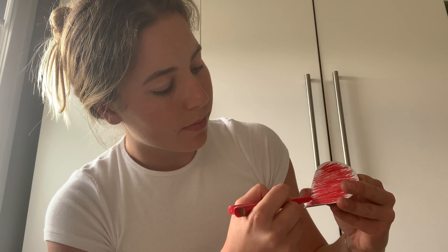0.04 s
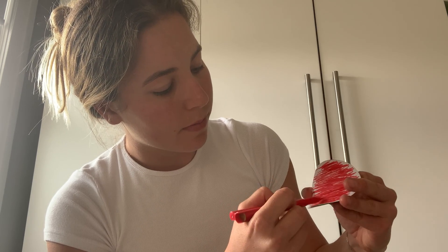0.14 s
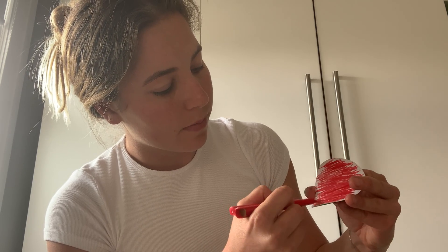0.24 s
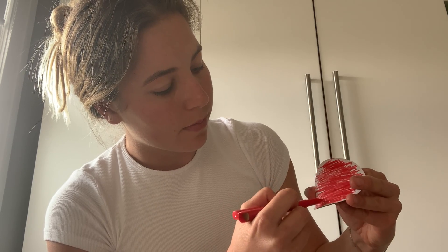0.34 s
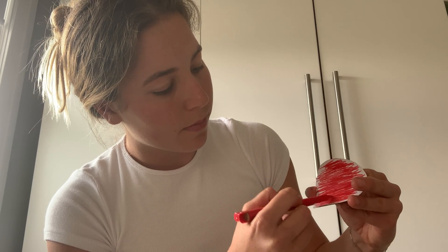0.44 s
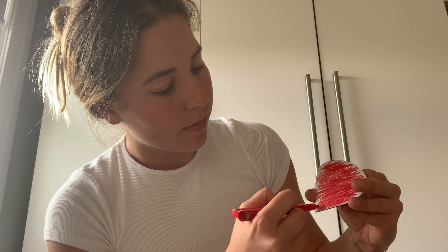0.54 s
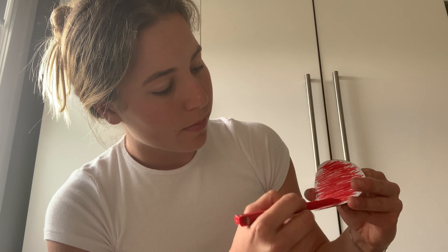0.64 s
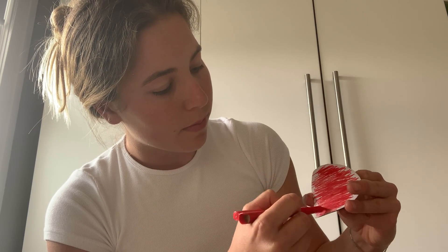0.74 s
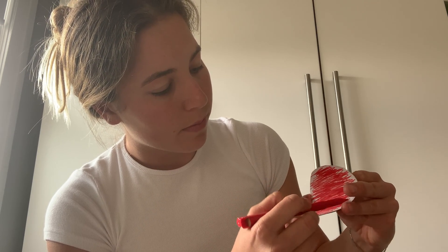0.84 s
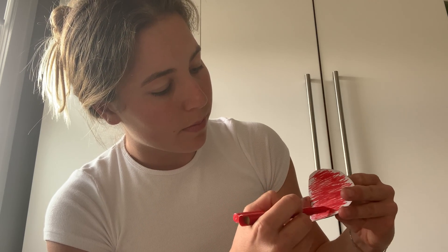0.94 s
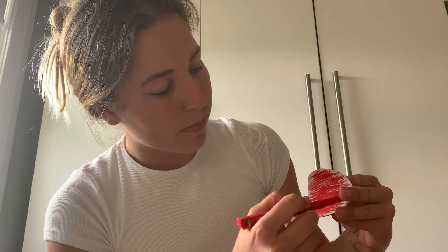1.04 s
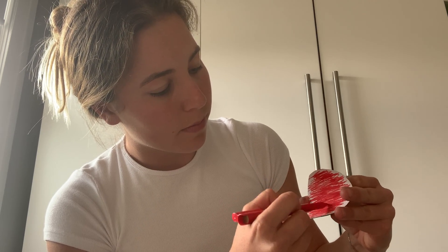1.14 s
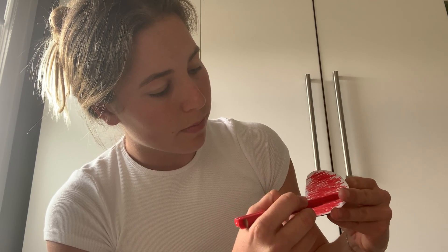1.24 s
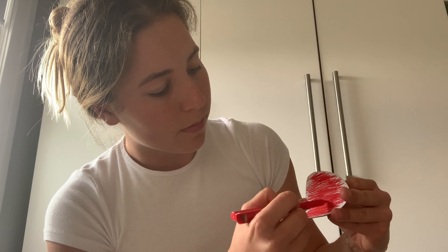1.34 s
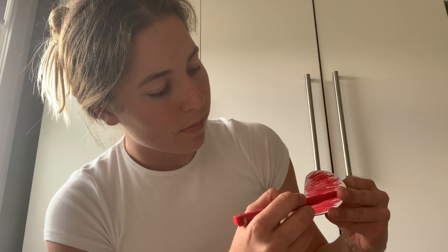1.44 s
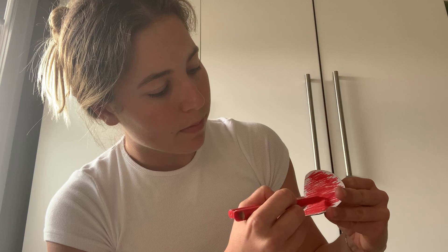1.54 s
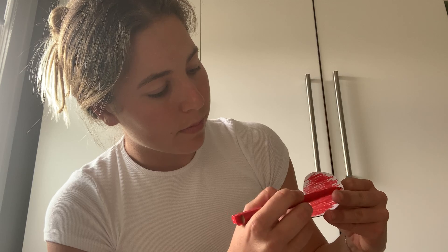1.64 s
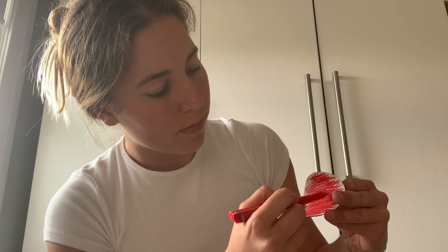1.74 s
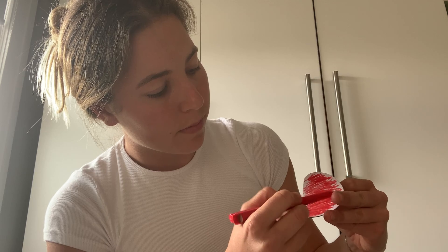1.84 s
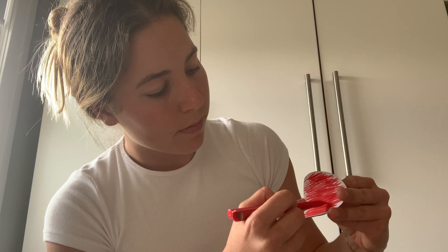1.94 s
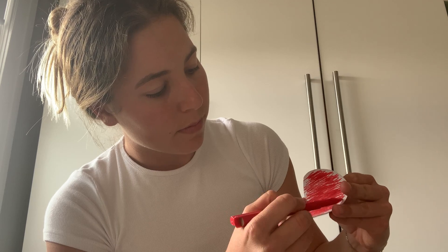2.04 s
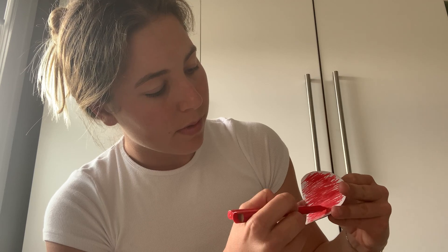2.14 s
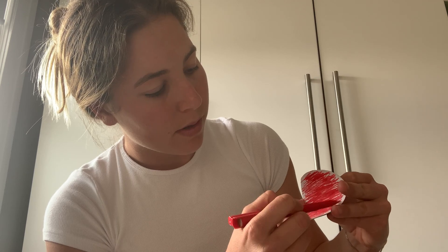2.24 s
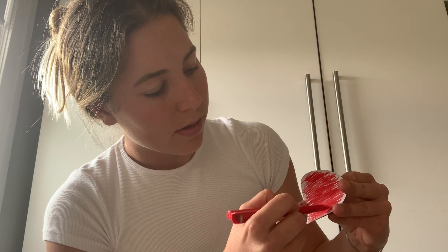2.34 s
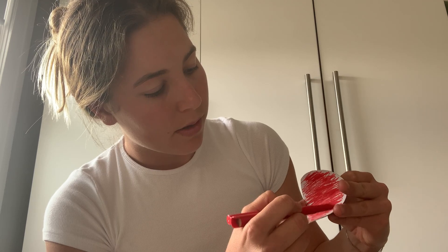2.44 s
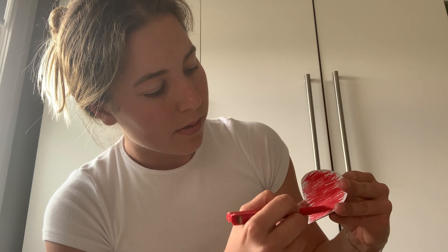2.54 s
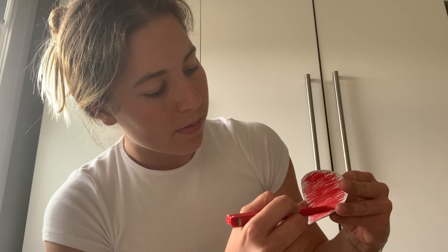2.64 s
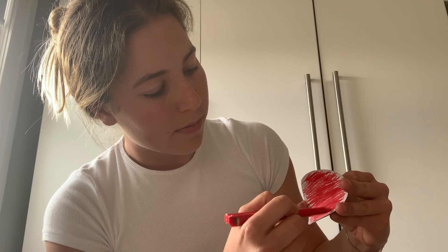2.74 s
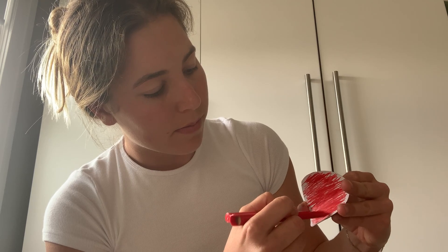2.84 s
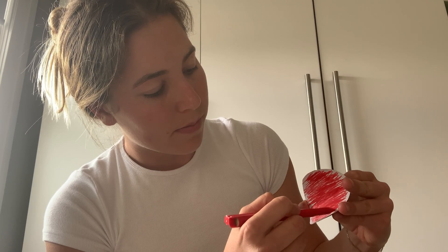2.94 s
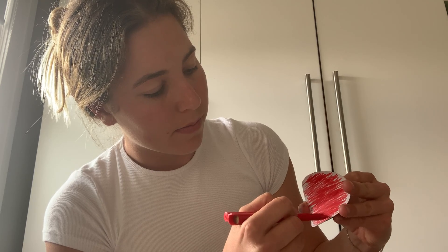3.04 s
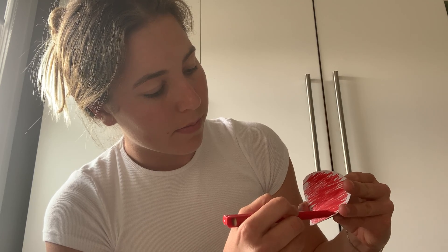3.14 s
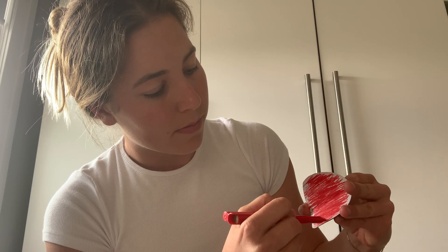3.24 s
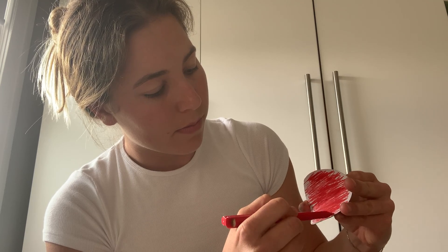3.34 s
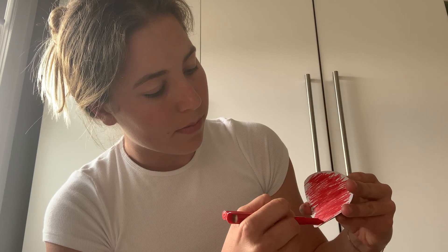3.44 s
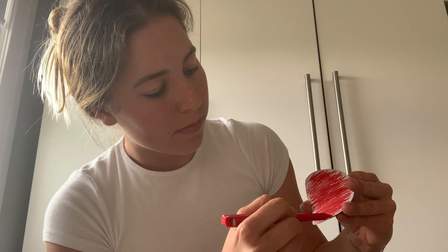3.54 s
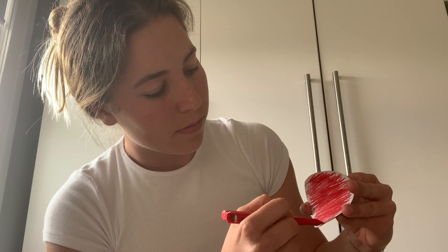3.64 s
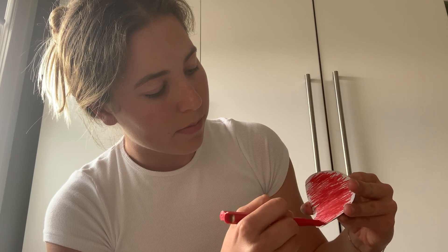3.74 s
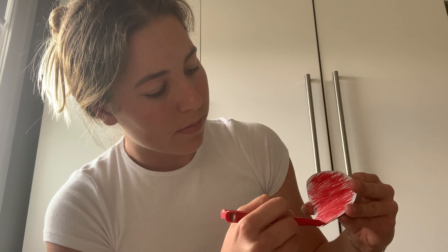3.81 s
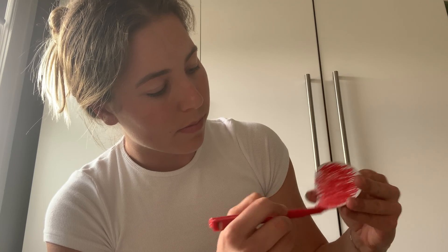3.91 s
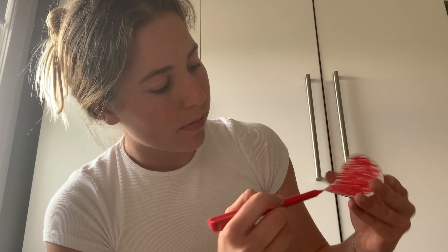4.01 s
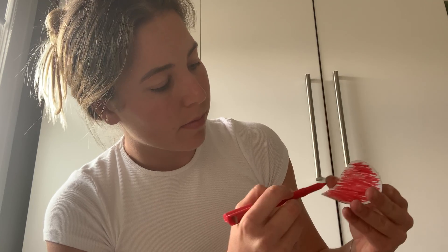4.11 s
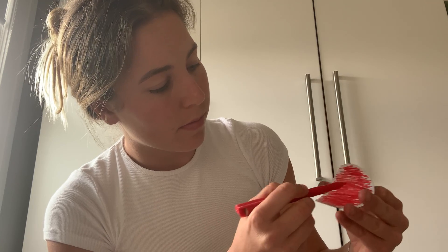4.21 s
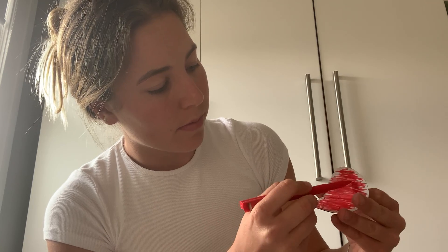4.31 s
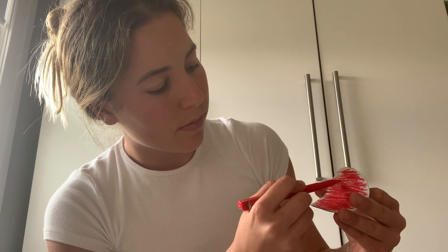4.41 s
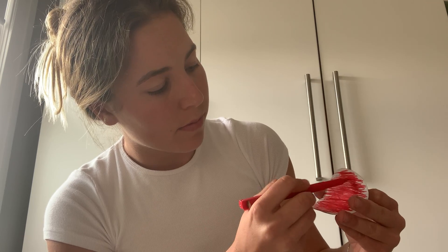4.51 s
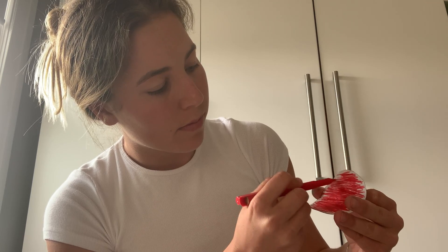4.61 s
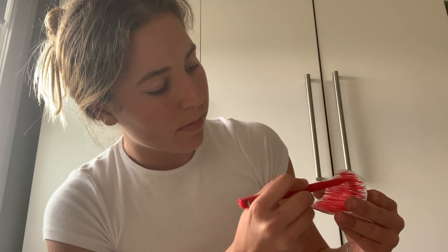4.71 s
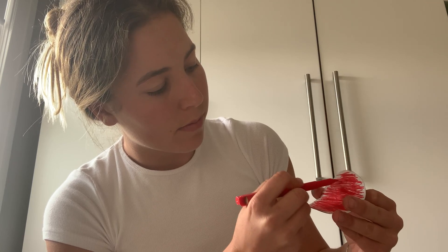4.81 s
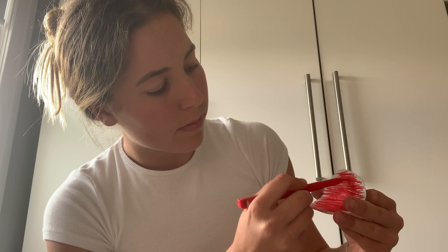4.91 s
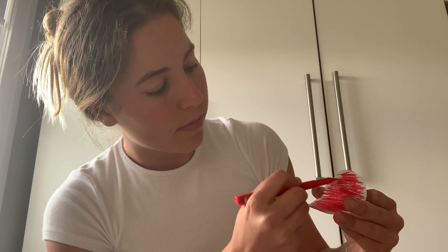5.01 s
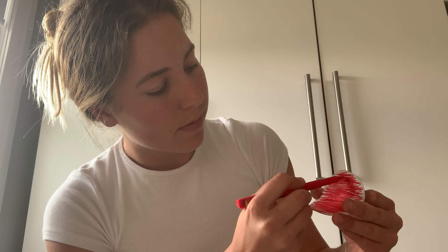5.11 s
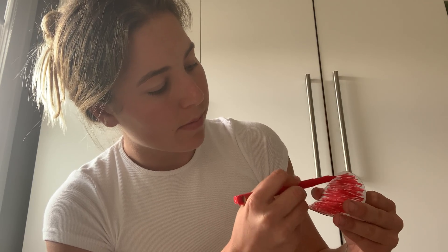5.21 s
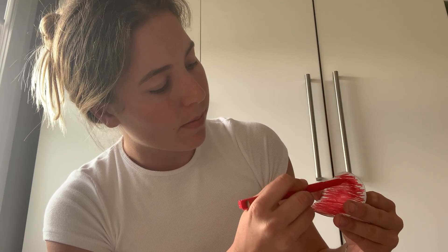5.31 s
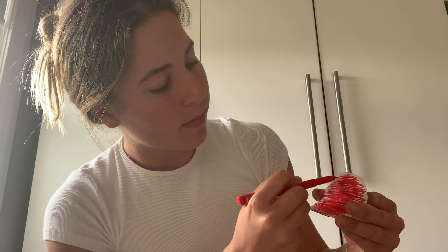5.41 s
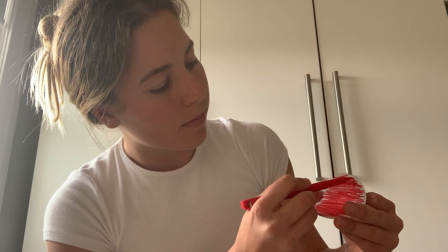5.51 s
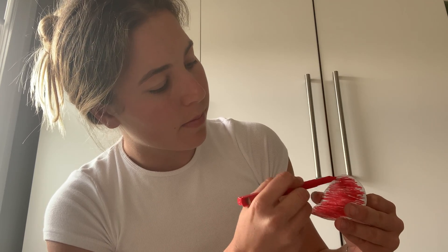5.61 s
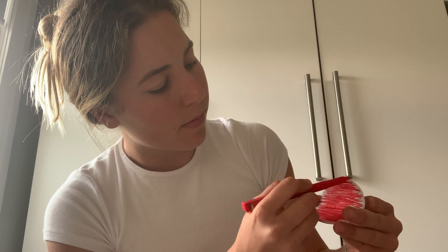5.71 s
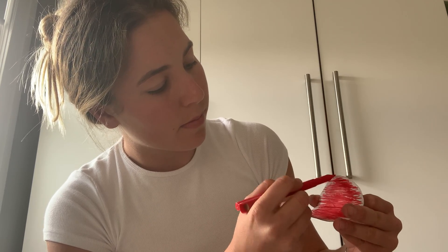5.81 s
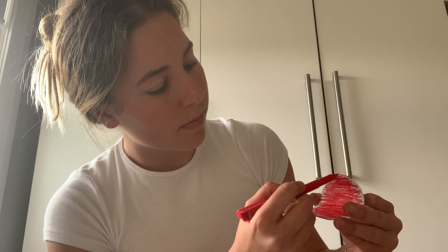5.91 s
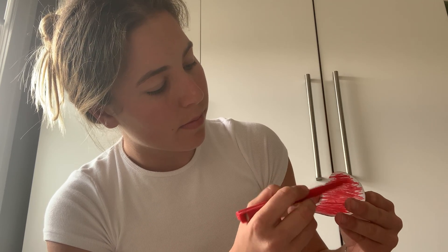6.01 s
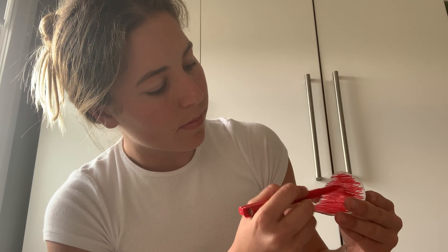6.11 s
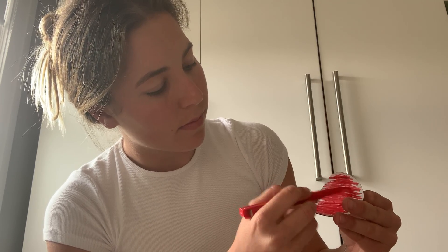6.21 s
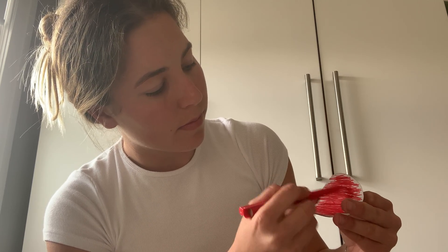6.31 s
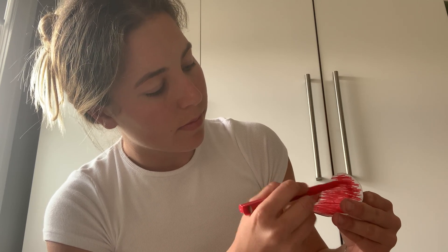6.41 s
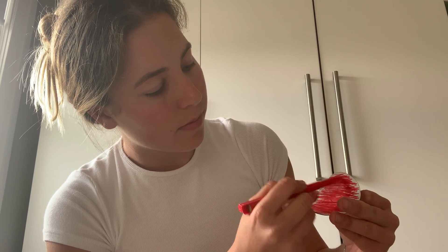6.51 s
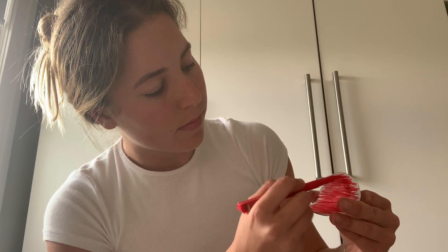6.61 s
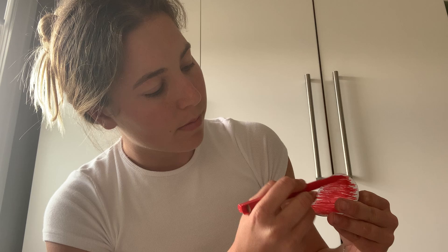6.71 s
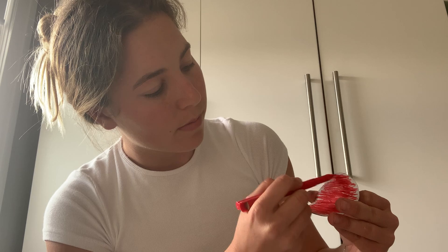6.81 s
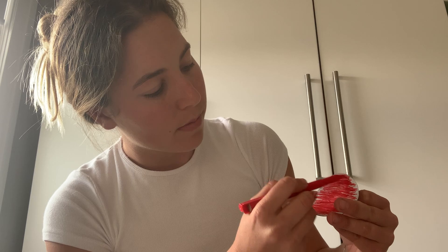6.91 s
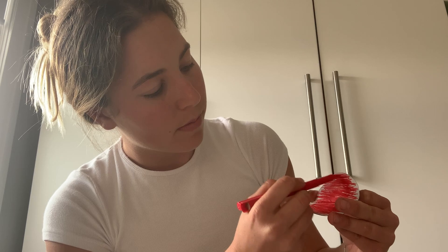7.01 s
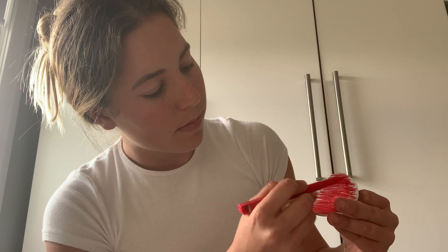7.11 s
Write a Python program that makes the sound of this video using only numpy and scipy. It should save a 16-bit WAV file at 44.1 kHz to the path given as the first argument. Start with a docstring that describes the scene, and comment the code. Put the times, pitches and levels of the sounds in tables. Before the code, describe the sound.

A felt-tip marker scribbles rapidly on a small card, hissing and rasping with two short pauses, over a faint fridge hum.

```python
"""A felt-tip marker scribbles back and forth, ten strokes a second, in three bouts on a hand-held card.
The felt hisses as its fibres catch and slip; the card rasps, flexes, and drums where the tip drags
near a loose edge. The tip lifts twice and taps down again.
Around it, a kitchen with a humming fridge, heard by two close microphones."""
import sys
import numpy as np
from scipy import signal
from scipy.fft import rfft, irfft, next_fast_len
from scipy.io import wavfile

SR = 44100
rng = np.random.default_rng(int(sys.argv[2]) if len(sys.argv) > 2 else 0)


def output_pcm(signal):
    """Save a mono or channel-first signal as 16-bit PCM at the path in sys.argv[1].

    Samples are clipped to [-1, 1] before scaling.
    """
    pcm = np.clip(np.atleast_2d(signal).T, -1, 1) * 32767
    wavfile.write(sys.argv[1], SR, np.round(pcm).astype(np.int16))


N = 315495
REGRIP_S = 4.2  # first grip gives way to second

# marker strokes: start/s, length/s, level/dB, pressure swell/dB, arch (0 flat, 2 peaked),
# turn re stroke/dB, scratch re hiss/dB, card rasp/dB, upper re lower card modes/dB
STROKES = [(-0.004, 0.082, -42, -6, 0.42, -18, 1, -65, 5),
           (0.092, 0.072, -45.0, 3, 0.35, -15, 3.5, -60, -4.5),
           (0.175, 0.086, -37.5, -8, 1.2, -29, -1, -63, 4.5),
           (0.275, 0.08, -47.5, -8, 0.4, -27, 3.5, -62, 4.5),
           (0.368, 0.081, -43, -6, 1.2, -28, 5, -68.5, 22),
           (0.466, 0.077, -46.0, 0.5, 0.15, -39, 3, -64.5, 12.5),
           (0.56, 0.084, -40.5, -8, 2, -31, 1, -58.5, 1),
           (0.651, 0.09, -42.5, 8, 0.21, -19, -0.5, -54.5, -4),
           (0.764, 0.071, -35, -6, 1.9, -23, -4.5, -55.5, -8),
           (0.849, 0.091, -37.0, 4, 0.65, -19, 0, -52.5, -7.0),
           (0.953, 0.083, -36.5, 2, 1.5, -27, -1.5, -54.5, 0),
           (1.054, 0.098, -41.5, -4, 1.6, -19, 1, -56.0, -1),
           (1.156, 0.069, -34.5, 6, 0.66, -23, -0.5, -56, 3),
           (1.243, 0.076, -41, 6, 0.76, -13, 3, -61.5, 11),
           (1.347, 0.082, -37.5, -3, 1.3, -28, -0.5, -62, -2.5),
           (1.442, 0.084, -43, 7, 1.7, -15, 1.5, -62.5, -1),
           (1.543, 0.082, -43.5, -4.5, 0.29, -27, -1, -62.5, -1),
           (1.643, 0.087, -47, -17.5, 1.2, -20, 2, -61.5, 1),
           (1.741, 0.087, -42.5, 8, 0.99, -21, 2.5, -61, 1.5),
           (1.843, 0.092, -46.5, 2, 0.76, -18, 5.5, -61, 1), (1.931, 0.1, -39, 11, 2.3, -26, 1, -64.0, 1),
           (2.039, 0.099, -40, 0, 1.9, -18, -2, -55, 4), (2.135, 0.093, -39, 1, 1.2, -23, -1.0, -54, -4),
           (2.237, 0.082, -39, 0, 1.4, -22, 2, -52.5, -5),
           (2.326, 0.083, -37.5, -3, 1.5, -17, -1, -54, 0.5),
           (2.422, 0.079, -39.5, 8, 1.1, -27, 0, -55, -3.5),
           (2.51, 0.081, -36.5, -3, 1, -22, -1.5, -53, -8.5),
           (2.612, 0.074, -42, -5, 0.65, -17, 0.5, -58, -4),
           (2.703, 0.086, -40, -4.5, 1.6, -22, 0.5, -56.5, -5.5),
           (2.798, 0.079, -39.5, 6, 1.4, -21, -2.5, -59.5, -1.5),
           (2.886, 0.071, -38, -5.5, 0.5, -18, -3.5, -55.5, 2),
           (2.984, 0.086, -41, -8, 1, -22, 0.5, -56, -0.5),
           (3.085, 0.071, -38.5, 1, 0.99, -21, -1, -54, 1.5),
           (3.181, 0.074, -40.5, 3, 1.1, -18, 1.5, -58, 6.5),
           (3.269, 0.086, -42, -9, 0.77, -22, -1.5, -53.5, -1.5),
           (3.37, 0.073, -42.5, 2, 1.5, -24, -1, -55.5, -2), (3.445, 0.085, -43, -7, 1.3, -18, 2, -55, -7),
           (3.54, 0.088, -45.5, -1, 2.1, -28, 4, -54.5, -5.0),
           (3.619, 0.074, -45.5, -4, 0.76, -22, 3.5, -52.5, -3.5),
           (3.717, 0.082, -47, -4, 1.2, -24, 3, -55, -8.5), (3.795, 0.075, -47.5, -6, 0.9, -25, 7, -55, -5),
           (3.881, 0.088, -48.5, 17, 1.6, -26, 9, -55, -5.5),
           (4.426, 0.12, -48.5, 14, 2.2, -35, 6.5, -65.5, 14),
           (4.547, 0.081, -50.5, -19, 0.4, -13, 3, -63, -3),
           (4.632, 0.094, -45.5, 11.5, 1.3, -20, 5.5, -62.5, 9.5),
           (4.74, 0.077, -43, -5, 1.3, -22, 3, -60, -12), (4.826, 0.098, -47.5, 15, 1.4, -19, 6.5, -59, 4),
           (4.939, 0.083, -45.5, -6, 2, -15, 3.5, -61, -2),
           (5.034, 0.09, -46.5, -4, 2.5, -17, 6, -60.5, -1),
           (5.126, 0.079, -53, -6, 0.71, -13, 7.5, -64, -6),
           (5.213, 0.086, -46.5, 5, 1.6, -13, 2.5, -60.0, 1.0),
           (5.312, 0.089, -49.5, -10, 1.1, -11, 3, -61.5, -3),
           (5.406, 0.092, -46.5, 6, 1.7, -20, 4.0, -60, -1),
           (5.507, 0.099, -50, -10.5, 0.3, -14, 0, -59, -1),
           (5.611, 0.097, -45.5, 4, 0.94, -14, 3.5, -58.5, 3),
           (5.731, 0.067, -42.5, -17, 0.64, -26, 4.5, -42.5, -4.5),
           (5.795, 0.17, -58.5, -3.5, 0.76, -22, 15.5, -52, -3.5),
           (6.147, 0.1, -45.5, 24, 2.2, -29, 4, -59.0, -0.5),
           (6.258, 0.092, -44.5, -1, 0.57, -17, 2, -60.5, 9.5),
           (6.356, 0.091, -43.5, 19, 0.64, -19, 2, -64.5, 17),
           (6.47, 0.079, -47.5, -8, 0.7, -11, 5.5, -60.5, 1.5),
           (6.556, 0.102, -48.0, 3, 1.2, -15, 4.5, -60.5, 2),
           (6.672, 0.096, -50.5, -9, 0.45, -22, 2.5, -58.5, -1),
           (6.772, 0.095, -46.5, 2.5, 0.68, -23, 4, -62.5, 4),
           (6.879, 0.1, -47.5, -6, 0.89, -14, 1.5, -62.5, 0.5),
           (6.98, 0.091, -49.0, -4, 1.1, -15, 5.5, -63, 2),
           (7.082, 0.085, -47.0, 3, 0.8, -21, 3.5, -60.5, 0)]


def amp(db):
    """Decibels to gain."""
    return 10 ** (np.asarray(db) / 20)


def unit(x):
    """Scale to rms 1."""
    return x / np.sqrt(np.mean(x ** 2) + 1e-20)


def read(points, hz):
    """Interpolate a table over log frequency."""
    f, value = np.transpose(points)
    return np.interp(np.log(hz + 1), np.log(f + 1), value)


def bins(size=4096):
    """Real-FFT frequencies in Hz."""
    return np.fft.rfftfreq(size, 1 / SR)


def wander(rate_hz):
    """Random curve of rms 1, varying up to about rate_hz."""
    knots = rng.standard_normal(N // 16)
    return unit(np.interp(np.arange(N) * 2 * rate_hz / SR, np.arange(len(knots)), knots))


def colour(x, spectrum):
    """Minimum-phase filter of unit energy; the spectrum sets shape only."""
    log_gain = np.log(amp(read(spectrum, bins())))
    phase = -signal.hilbert(np.r_[log_gain, log_gain[-2:0:-1]]).imag[:len(log_gain)]
    impulse = irfft(np.exp(log_gain + 1j * phase))
    return signal.oaconvolve(x, impulse / np.linalg.norm(impulse))[:N]


def resonate(x, hz, width_hz):
    """Unity-gain resonance following the curve hz."""
    carrier = np.exp(2j * np.pi * np.cumsum(hz) / SR)
    pole = np.exp(-np.pi * width_hz / SR)
    return 2 * (carrier * signal.lfilter([1 - pole], [1, -pole], x / carrier)).real


def by_stroke(values):
    """Hold each stroke's value until the next begins."""
    stroke = np.searchsorted(np.transpose(STROKES)[0], np.arange(N) / SR) - 1
    return values[np.maximum(stroke, 0)]


def diffuse(pair):
    """Give two independent signals the coherence of diffuse sound at the microphones."""
    # diffuse field: f/Hz, coherence (clipped to +-1)
    likeness = [(50, 0.72), (160, 1), (400, 0.8), (1500, 0.2), (2400, -0.45), (3000, 0.37), (3500, -1.07),
                (4100, 0.26), (4600, -0.2), (6500, -0.66), (8000, 1), (9400, 0.95), (11000, 0.78),
                (13300, 0.56), (15500, -0.4)]
    size = pair.shape[1]
    common, apart = rfft(pair)
    coherence = np.clip(read(likeness, bins(size)), -1, 1)
    mid = common * np.sqrt((1 + coherence) / 2)
    side = apart * np.sqrt((1 - coherence) / 2)
    return irfft(np.array([mid + side, mid - side]), size)


def air():
    """Steady rumble and faint hiss of the room."""
    # room noise: f/Hz, level/dB
    spectrum = [(20, -33.5), (35, -18.5), (55, 1), (70, -0.5), (110, 1.5), (135, 1), (160, -8), (200, -9),
                (300, -19), (550, -26), (1200, -30.5), (3300, -45), (9500, -45), (15500, -44.5)]
    pair = np.array([colour(noise, spectrum) for noise in rng.standard_normal((2, N))])
    return amp(-60) * diffuse(pair)


def fridge(throb_hz=3.9):
    """Low hum, throbbing as the compressor rocks on its springs."""
    # hum lines: f/Hz, level/dB, throb depth (0-1)
    lines = [(62.3, -75.5, 0.2), (99.2, -65.5, 0.56), (132.6, -67, 0.76), (136.7, -68.5, 1)]
    t = np.arange(N) / SR
    throb = np.sin(2 * np.pi * (throb_hz * t + rng.random()) + 0.15 * wander(rate_hz=1.78))
    return sum(amp(db) * unit((1 + depth * throb) * np.sin(2 * np.pi * (hz * t + rng.random())))
               for hz, db, depth in lines)


def reflections(echoes_per_s=4000, gap_s=0.004):
    """Sparse stereo echoes, each band decaying at its own rate."""
    # reverberation time: f/Hz, T60/s
    t60 = [(200, 0.05), (800, 0.24), (2100, 0.17), (5500, 0.17), (15000, 0.47)]
    # reverberation strength: f/Hz, level re direct/dB
    wet = [(200, 5), (1000, 1.5), (1700, -5), (2900, 1), (4000, 3.5), (6500, -3.5), (10000, -14),
           (15000, -30)]
    size = SR // 2
    echoes = rng.choice([-1., 1.], (2, size)) * (rng.random((2, size)) < echoes_per_s / SR)
    echoes[:, :round(gap_s * SR)] = 0
    hz, t, bands = signal.stft(diffuse(echoes), SR, nperseg=256)
    decay = amp(-60 * t / read(t60, hz)[:, None])
    decay *= amp(read(wet, hz))[:, None] / np.sqrt(np.mean(decay ** 2, axis=1, keepdims=True))
    return signal.istft(bands * decay, SR, nperseg=256)[1] / np.linalg.norm(echoes[0])


def room(x):
    """Reverberation; two echo patterns crossfade as the hands move."""
    angle_rad = 1.7 * wander(rate_hz=2.5)
    return sum(signal.fftconvolve((x * share)[None], reflections(), axes=1)[:, :N]
               for share in (np.cos(angle_rad), np.sin(angle_rad)))


def hands(decay_s=0.04):
    """Dull thuds of the hands shifting on the card."""
    # thuds: t/s, level/dB
    thuds = [(2.915, -53), (3.025, -51.5)]
    # thud spectrum: f/Hz, level/dB
    spectrum = [(20, -52), (60, 5), (110, -15), (180, -7), (300, -14.5), (700, -36), (3000, -61)]
    t = np.arange(N) / SR
    force = sum((t >= start_s) * amp(db) * np.exp(-abs(t - start_s) / decay_s) for start_s, db in thuds)
    return colour(force * rng.standard_normal(N), spectrum)


def pulses(events, length_in_rises):
    """Smooth force pulses from rows of t/s, peak/dB, rise/s."""
    t, force = np.arange(N) / SR, np.zeros(N)
    for start_s, db, rise_s in events:
        span = slice(*np.searchsorted(t, [start_s, start_s + length_in_rises * rise_s]))
        u = (t[span] - start_s) / rise_s
        force[span] += amp(db) * u * np.exp(1 - u)
    return force


def flexing(rise_s=0.011):
    """A soft burst of noisy force each time the card gives way."""
    # card flexes: t/s, level/dB
    flexes = [(0.2, -63.5), (1.48, -60.5), (1.562, -63.5), (1.672, -59), (4.38, -64.5), (4.58, -63),
              (4.653, -63.5), (4.778, -61.5), (4.979, -68), (5.157, -64.5), (5.343, -61), (5.439, -70),
              (5.527, -59), (5.662, -59), (6.149, -67), (6.599, -58.5), (6.701, -65), (6.801, -61),
              (6.901, -66), (6.98, -72.5)]
    envelope = pulses([(start_s, db, rise_s) for start_s, db in flexes], length_in_rises=10)
    return envelope * rng.standard_normal(N)


def knocks():
    """Force of the tip knocking on the card; longer contact is duller."""
    # knocks: t/s, force/dB, contact/s
    taps = [(2.712, -47, 0.00003), (2.89, -38, 0.000028), (4.378, -37, 0.00055), (4.582, -40, 0.00042),
            (4.664, -43.5, 0.00053), (4.794, -40.5, 0.00038), (5.511, -44, 0.00002),
            (5.688, -32.5, 0.000049), (5.746, -33, 0.00011), (5.764, -33, 0.000095), (5.792, -46, 0.00022),
            (5.855, -36.5, 0.00011), (5.914, -40, 0.000095), (6.153, -43, 0.00044), (6.504, -41, 0.0002),
            (6.829, -51, 0.00052)]
    return pulses(taps, length_in_rises=20)


def ticks():
    """The tip's dry tick at each knock."""
    # tick spectrum: f/Hz, level/dB
    spectrum = [(150, -25.5), (450, -3), (900, -2), (1800, 2), (4000, -1), (9000, -11), (15000, -1)]
    return amp(-5.5) * colour(knocks(), spectrum)


def card(force, spectrum, roam_db, bright_db=0, pivot_hz=1660):
    """Card modes: levels vary with grip and as the tip crosses nodes; pitch drifts with bending."""
    # modes: f/Hz, width/Hz, first-grip level/dB, second-grip level/dB
    modes = [(449, 98, -7.5, -5.5), (605, 58, -13.5, -5), (784, 96, -5, 0), (878, 65, -3, 1.5),
             (1169, 130, 2.5, 5), (1516, 85, 1.5, 2.5), (1648, 114, 3.5, 3), (1866, 155, 4.5, -0.5),
             (2282, 147, 5.5, 3), (2776, 227, 4, -1.5), (4000, 810, -5, -7)]
    t, ring = np.arange(N) / SR, np.zeros(N)
    drive = colour(force, spectrum)
    for k, (hz, width_hz, first_db, second_db) in enumerate(modes):
        grip_db = np.where(t < REGRIP_S, first_db, second_db)
        tilt_db = bright_db * np.clip(np.log2(hz / pivot_hz), -.5, .5)
        coupling = amp(grip_db + tilt_db + roam_db * wander(rate_hz=16))
        ring += (-1) ** k * signal.lfilter(*signal.iirpeak(hz, hz / width_hz, fs=SR), drive * coupling)
    bend_s = 0.001225 * wander(rate_hz=5)
    return unit(np.interp(t - bend_s, t, ring)) * np.std(force)


def sweep(starts_s, ends_s, levels_db, swells_db, arches, bite_s, head_start):
    """Rubbing envelope: the tip breaks free, speeds up and stops while pressure swells or fades."""
    t, envelope = np.arange(N) / SR, np.zeros(N)
    for start_s, end_s, db, swell_db, arch in np.broadcast(starts_s, ends_s, levels_db, swells_db, arches):
        span = slice(*np.searchsorted(t, [start_s, end_s]))
        age_s = t[span] - start_s
        progress = age_s / (end_s - start_s)
        speed = abs(np.sin(np.pi * (head_start + (1 - head_start) * progress)))
        attack = 1 - np.exp(-age_s / bite_s)
        envelope[span] += attack * speed ** abs(arch) * amp(db + swell_db * (progress - .5))
    return envelope


def friction(snags_per_s, spread_db, snag_share, grain_db, grain_hz):
    """Countless tiny fibre slips plus fewer large snags, clumped by the paper's tooth."""
    sizes = amp(spread_db * np.minimum(rng.exponential(1, N), 4)) * rng.choice([-1, 1], N)
    snags = unit(sizes * (rng.random(N) < snags_per_s / SR))
    force = np.sqrt(snag_share) * snags + np.sqrt(1 - snag_share) * rng.standard_normal(N)
    return unit(force * amp(grain_db * wander(grain_hz)))


def felt(rubbing, scratch_db, split_hz=7800, echo_s=0.0014, nib_drift=0.02):
    """Felt hiss; its low band is a scratch, recoloured each stroke by nib resonances and finger echoes."""
    # sliding felt: f/Hz, first-grip level/dB, second-grip level/dB
    spectra = [(306, -31, -38.5), (2580, -29, -28.5), (3370, -26, -25), (4090, -22.5, -18.5),
               (4570, -27, -27.5), (5280, -18.5, -16.5), (6200, -13.5, -17), (8020, -12, -12),
               (8620, -7.5, -4.5), (8830, -8.5, -7.5), (9380, -3.5, -4), (11150, 2.5, 2.5),
               (11740, -1.5, -7), (12400, 4, 2.5), (13600, -2, -3), (14700, 1.5, 1), (15300, -1.5, -3.5)]
    t, count = np.arange(N) / SR, len(STROKES)
    first, second = (colour(rubbing, np.array(spectra)[:, [0, grip]]) for grip in (1, 2))
    hiss = np.where(t < REGRIP_S, first, second)
    low = signal.sosfiltfilt(signal.butter(3, split_hz, fs=SR, output="sos"), hiss)
    delays_s = echo_s * (.5 + 2 * rng.random((count, 3)))
    echoes = sum(np.interp(t - by_stroke(delay_s), t, low) for delay_s in delays_s.T)
    nib_hz = rng.uniform(3960, 6870, (count, 2))  # new pitches each time the nib bends over
    nib = sum(resonate(low, by_stroke(hz) * (1 + nib_drift * wander(rate_hz=19)), width_hz=207)
              for hz in nib_hz.T)
    scratch = amp(-1.5) * (low + 0.37 * echoes + amp(0.5) * nib)
    return hiss - low + scratch * amp(by_stroke(scratch_db) + 0.6 * wander(rate_hz=17))


def marker(turn_s=0.048, drum_re_rasp_db=-8):
    """The sliding tip hisses and sets the card rasping, drumming, flexing and knocking."""
    # drags near a loose edge: start/s, end/s, drumming level/dB
    drags = [(0.66, 0.773, -56), (0.852, 0.94, -55), (4.428, 4.534, -54.5), (4.54, 4.63, -59),
             (4.632, 4.73, -56), (5.72, 5.794, -51), (5.814, 5.965, -56.5), (6.249, 6.333, -49),
             (6.366, 6.451, -50), (6.467, 6.549, -54.5)]
    # spectra of the forces on the card: f/Hz, level/dB
    rasp_spectrum = [(150, -3), (450, -7.5), (1100, 0.5), (2200, 9.5), (4200, 5), (7000, -11.5),
                     (14000, -68)]
    drum_spectrum = [(100, -59), (250, 9.5), (500, 4), (1100, -1), (1700, -9), (2600, -17.5), (6000, -57)]
    flex_spectrum = [(120, 4), (280, 8), (420, 2.5), (620, -14.5), (1000, -23), (3000, -72)]
    knock_spectrum = [(100, 1), (400, 1), (1200, -4), (3000, 0.5), (8000, -13)]
    start_s, length_s, level_db, swell_db, arch, turn_db, scratch_db, rasp_db, bright_db = (
        np.transpose(STROKES))
    end_s = start_s + length_s

    pressure = unit(amp(wander(rate_hz=62)))
    fibres = pressure * friction(2600, spread_db=3.5, snag_share=0.15, grain_db=0.94, grain_hz=587)
    judder = pressure * friction(300, spread_db=1.5, snag_share=0.53, grain_db=-0.5, grain_hz=123.6)
    ridges = unit(amp(1.6 * wander(rate_hz=45)))

    sliding = sweep(start_s, end_s, level_db, swell_db, arch, bite_s=0.0024, head_start=0.17)
    # faint rubbing while the hand turns
    turning = sweep(end_s - turn_s, end_s + turn_s, level_db + turn_db - 7, 0,
                    arches=0.31, bite_s=0.005, head_start=0.11)
    scraping = sweep(start_s, end_s, rasp_db, 0.095 * swell_db, arches=0.24, bite_s=7e-4, head_start=0.42)
    pushing = sweep(start_s, end_s, rasp_db + drum_re_rasp_db, 0, arches=1, bite_s=0.038, head_start=0.02)
    dragging = sweep(*np.transpose(drags), 0, arches=2.35, bite_s=0.026, head_start=0.013)

    hiss = felt(fibres * np.hypot(sliding, turning), scratch_db)
    rasp = card(fibres * ridges * scraping, rasp_spectrum, roam_db=1.8, bright_db=by_stroke(bright_db))
    drum = card(judder * np.hypot(pushing, dragging), drum_spectrum, roam_db=2.5)
    flex = card(flexing(), flex_spectrum, roam_db=-1.5)
    taps = card(knocks(), knock_spectrum, roam_db=5)
    return amp(1) * hiss + amp(-5.5) * rasp + amp(-3.5) * drum + amp(-2.5) * flex + amp(-5) * taps


def scene():
    """Marker and hands with their reverberation, dry ticks, room air and fridge."""
    near = marker() + hands()
    return near + ticks() + room(near) + air() + fridge()


def record(dry, cutoff_hz=15800):
    """Two microphones differing in phase and level, then a low-pass."""
    # microphone phase difference: f/Hz, left lead/rad
    lead = [(0, 0), (1200, -.6), (1500, -1.8), (1900, -1.9), (2150, -2.9), (3300, -3), (3700, -4.1),
            (4100, -5.9), (4900, -6), (5800, -7.2), (7600, -6.8), (8100, -4.9), (8600, -4.8), (9250, -3.25),
            (9600, -3.05), (11400, 0), (13150, 3.05), (13500, 3.25), (15000, 6.1), (15800, 6.9)]
    # microphone balance: f/Hz, left minus right/dB
    balance = [(250, -0.2), (500, -0.082), (1200, -1.6), (4000, 0.082)]
    size = next_fast_len(N + 4096)
    hz, side = bins(size), np.array([[.5], [-.5]])
    response = np.exp(1j * side * read(lead, hz)) * amp(side * read(balance, hz))
    heard = irfft(rfft(dry, size) * response, size)[:, :N]
    lowpass = signal.firwin(801, cutoff_hz, window=("kaiser", 8), fs=SR)
    return signal.oaconvolve(heard, lowpass[None], "same")


dry = scene()
out = record(dry)
output_pcm(out)
```